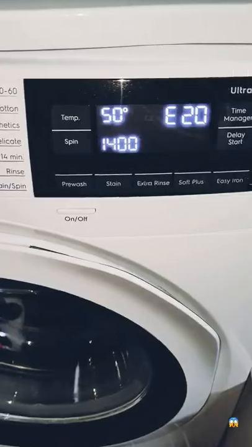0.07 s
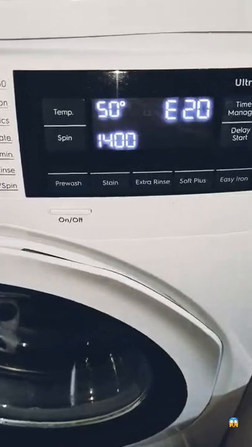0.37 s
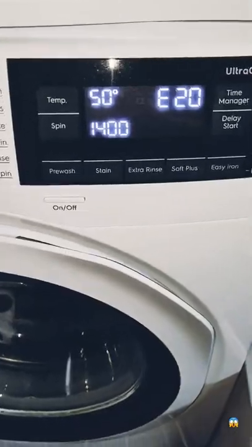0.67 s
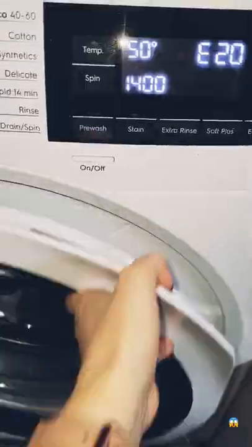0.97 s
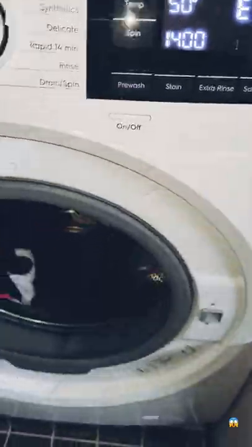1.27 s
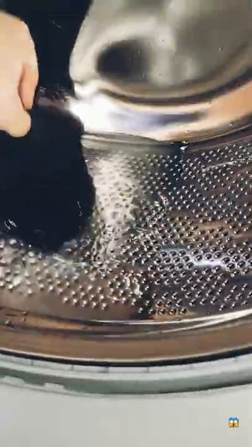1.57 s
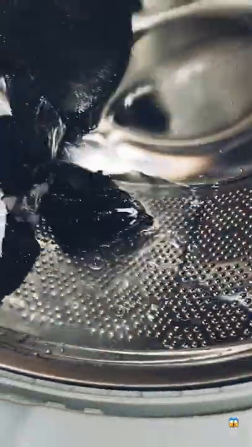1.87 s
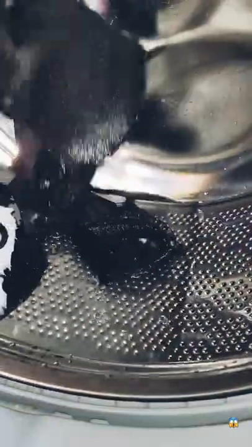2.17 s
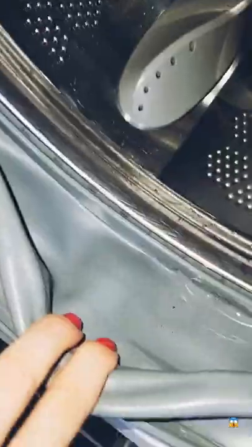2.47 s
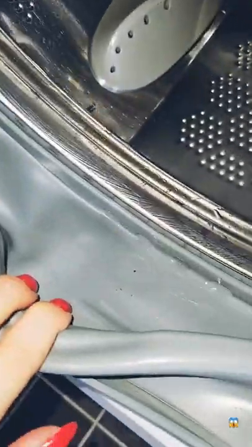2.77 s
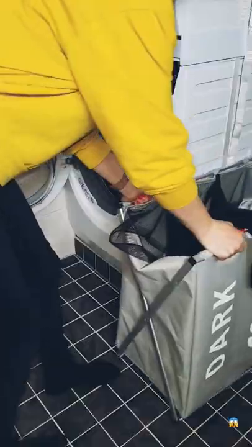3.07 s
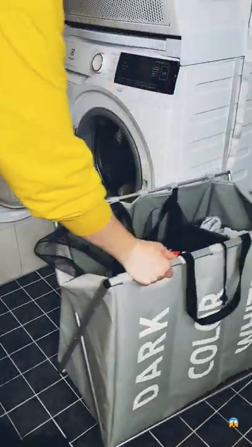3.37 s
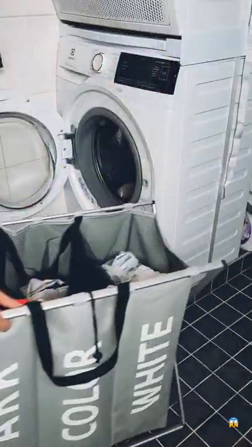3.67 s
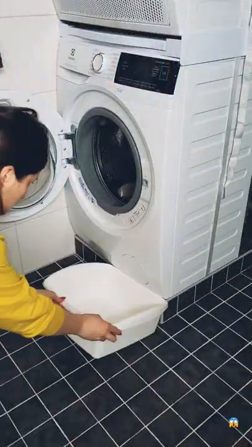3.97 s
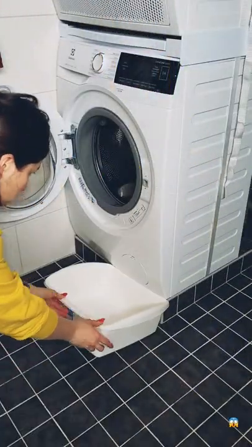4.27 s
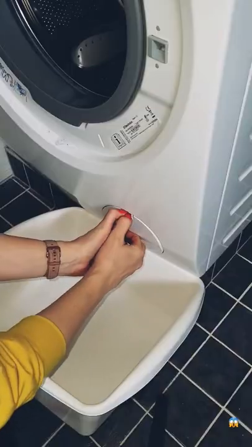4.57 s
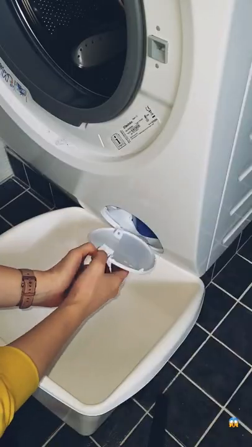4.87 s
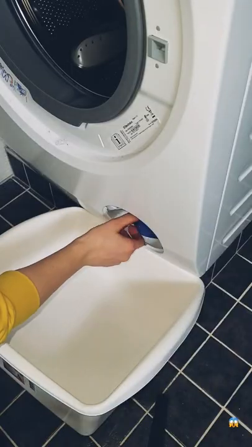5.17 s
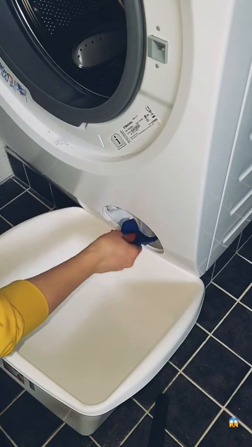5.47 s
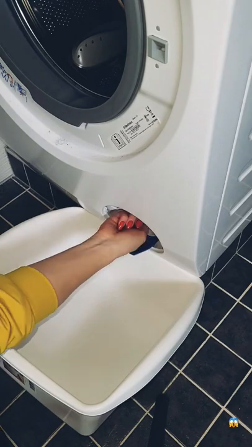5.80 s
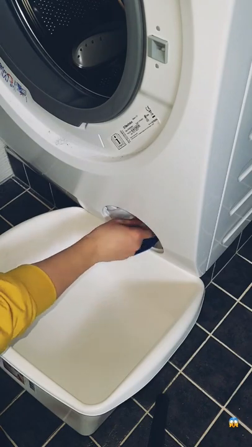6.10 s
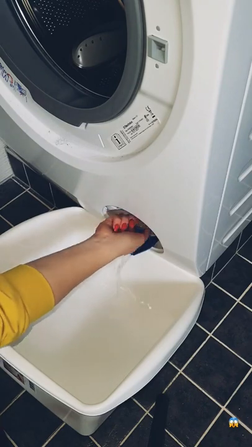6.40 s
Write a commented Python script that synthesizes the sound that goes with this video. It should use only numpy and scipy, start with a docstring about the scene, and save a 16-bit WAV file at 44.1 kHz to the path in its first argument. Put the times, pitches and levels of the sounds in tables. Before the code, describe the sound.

Water gurgles and drips softly in the bottom of a stalled washing machine, close by in a small tiled room. At about 0.9 seconds the door latch clacks and the door jolts with a deep thump, the loudest moment. From 1.2 to 2.4 seconds wet laundry squelches and drips in the drum, with sharper splashes near 1.8 and 2.3. The rubber seal rubs faintly at 2.5. From 3 to 4 seconds a hamper knocks, scrapes and judders over the tiles, growing louder and ending in two hollow bumps. Fingers rub quietly at a plastic flap, which clicks off at 5 seconds. Between 5.2 and 5.4 the tight filter cap gives three short squeaks with sharp snaps, then grinds softly round with small clicks. From 6 seconds water bubbles past the cap, spurting and pattering lightly into a plastic tray until about 6.7.

```python
"""First you hear water gurgling in the bottom of a stalled washing machine, close by in a small tiled room.
The door clacks open, wet laundry drips and splashes in the drum, and the rubber seal is pulled back.
A hamper scrapes over the tiles, a flap clicks off, the filter cap squeaks and knocks loose, and water
spurts into a plastic tray. Bubbles are short rising tones with a splash; knocks and scrapes are crowds
of tiny clicks, coloured by the part that is hit or rubbed."""
import sys
import numpy as np
from scipy import signal
from scipy.fft import rfft, irfft, next_fast_len
from scipy.io import wavfile
from scipy.ndimage import uniform_filter1d

SR = 44100
rng = np.random.default_rng(int(sys.argv[2]) if len(sys.argv) > 2 else 0)


def master(y):
    """Save y as 16-bit WAV."""
    cut = np.clip(np.atleast_2d(y).T, -1, 1)
    pcm = np.round(cut * 32767)  # scale
    wavfile.write(sys.argv[1], SR, pcm.astype(np.int16))


N = 292824
TIME = np.arange(N) / SR
PAD = next_fast_len(N + SR // 3, True)
FREQ = np.maximum(np.arange(PAD // 2 + 1) * SR / PAD, 1)


# hits of the latch and hinge: t/s, clack/dB, body/dB, tick/dB
DOOR_HITS = [(0.929, -7, -30, -27), (0.938, -13, -28.5, -35.5), (0.984, -26, -37.5, -31.5),
             (1.039, -22, -21.5, -23), (1.048, -15.5, -18, -22), (1.131, -31, -38, -33.5),
             (1.141, -21.5, -43, -29)]
# pitches the door rings at: f/Hz, width/Hz, level/dB
DOOR_MODES = [(340, 150, 1), (844, 67, 0.5), (1170, 500, 1.5), (1790, 150, -11)]

def door():
    """The latch snaps free and the door jolts on its hinge."""
    body = resonance(DOOR_MODES) + undb(-15) * resonance([(1810, 6100, 0.0015)])
    return blows(DOOR_HITS, body, rise_s=0.0013, grit_db=2.5,
                 clack_db=-8, body_db=-1.5, tick_db=-0.5, t60=0.085, body_t60=0.14)


# dull thuds of the cabinet, hamper and pump housing: t/s, f/Hz, level/dB
THUDS = [(0.938, 111, -21.5), (1.016, 113.3, -14.5), (1.045, 113.5, -1.5), (1.052, 65, -11),
         (1.571, 76.5, -34), (1.637, 64.6, -34), (2.336, 108, -28), (3.013, 92.6, -32.5),
         (3.551, 67.5, -20.5), (3.616, 79.5, -24.5), (3.693, 76.5, -22), (3.782, 85, -25),
         (3.925, 401, -11), (4.04, 276, -10.5), (4.041, 164.7, -13.5), (5.402, 112, -22.5),
         (5.634, 105, -34.5), (5.816, 181, -29)]

def thuds():
    """Big panels and hollow parts boom briefly on one low tone."""
    s, hz, db = np.transpose(THUDS)
    t60 = 0.14 * (100 / hz) ** 0.37  # lower thuds ring longer
    return rings(np.transpose([s, hz, db, t60]), glide=-0.0017, rise_s=0.0031)


# the hamper is gripped, dragged and shoved: t/s, length/s, rumble/dB, scrape/dB, judder/dB
DRAGS = [(3.06, 0.13, -56, -44.5, -56.5), (3.18, 0.86, -38.5, -40.5, -39.5),
         (3.845, 0.099, -29.5, -25, -19), (3.955, 0.08, -28.5, -25, -26)]
# tone of the hollow bag: f/Hz, level/dB
HAMPER_COLOUR = [(35, -12.5), (70, 7.5), (115, -8.5), (190, -1.5), (900, -17), (4500, -18), (7900, -21.5),
                 (10000, -25), (15000, -23)]
# pitches its frame rings at: f/Hz, width/Hz, level/dB
FRAME_MODES = [(308.4, 13.3, 9), (394.6, 47, 8.5), (468, 140, -1), (597, 26, -1.5), (685, 10, 5),
               (1024, 49, -5.5)]

def hamper():
    """The hamper's feet and cloth scrape over the tiles; sticking and slipping shakes its frame."""
    # each pull swells as it gathers speed
    rumble, sliding, shaking = strokes(DRAGS, attack_s=0.017, fall_db_per_s=276.5, swell_db_per_s=10)
    slips = grains(1200, 1) * undb(4.5 * walk(28))
    frame = resonance(FRAME_MODES) * above(150) * below(1300)
    judder = unit(shape(slips, frame)) * shaking * undb(-0.5)
    scrape = rub((rumble, sliding), HAMPER_COLOUR, rate=2400, grit_db=0.5,
                 flutter_hz=60, flutter_db=1, rumble_db=-2, scrape_db=-2, edge_hz=300)
    scrape = echoes(scrape, t60=0.028, wet_db=-2.5, top_hz=8700)
    return judder + wander(scrape, rate=35, depth_db=3, low_hz=402)


# the swinging door stirs the air, then handfuls of wet laundry shift in the drum: t/s, length/s, rumble/dB,
# fizz/dB
HANDFULS = [(1.17, 0.13, -48, -52), (1.41, 0.26, -47, -52.5), (1.69, 0.22, -53.5, -51),
            (1.93, 0.1, -53, -60), (2.28, 0.15, -63.5, -55.5)]
# water slapping the drum, later the tray: t/s, slap/dB, spray/dB
SPLASHES = [(1.453, -49, -43), (1.473, -49, -59), (1.745, -33.5, -39.5), (1.766, -19.5, -28.5),
            (1.778, -27.5, -30.5), (1.82, -31.5, -29.5), (1.865, -40, -36), (1.982, -41, -33.5),
            (2.003, -37.5, -32), (2.071, -50, -33.5), (2.326, -19.5, -20.5), (2.339, -20, -21),
            (6.342, -30.5, -39.5), (6.549, -43.5, -60), (6.62, -35, -49.5)]
# tone of the laundry and of the splashes: f/Hz, level/dB
LAUNDRY_COLOUR = [(40, -1), (85, 6.5), (210, -12.5), (1000, -38), (5000, -34.5), (7900, -35.5), (9500, -41),
                  (15000, -34)]
SPLASH_COLOUR = [(400, 5), (750, 8), (1200, 5.4), (1900, 5), (3000, 4), (7500, 11.7), (10000, 6.6),
                 (13000, 16.3), (16000, 3)]
# single bubbles and drips: t/s, f/Hz, level/dB
DRIPS = [(0.112, 785, -28), (0.283, 569, -32.5), (0.308, 763, -39), (0.335, 2740, -44), (0.405, 805, -38.5),
         (0.493, 3360, -38), (0.513, 1455, -39.5), (0.595, 750, -35.5), (0.69, 2400, -40),
         (0.725, 1155, -38), (0.795, 1620, -38.5), (0.8, 2710, -42), (0.865, 1070, -34.5),
         (1.423, 6570, -26.5), (1.455, 4460, -32.5), (1.646, 2740, -32), (1.727, 436.5, -50),
         (1.871, 4120, -33), (1.985, 5600, -29.5), (6.335, 3597, -37.5), (6.483, 2866, -42)]

def water():
    """Wet cloth fizzes, drops slap the steel and the tray, trapped bubbles ring."""
    stirring = strokes(HANDFULS, attack_s=0.0044, fall_db_per_s=130)
    fizz = rub(stirring, LAUNDRY_COLOUR, rate=6500, grit_db=2,
               flutter_hz=40.66, flutter_db=1.5, rumble_db=-4, scrape_db=-2, edge_hz=313)
    hits = [(s, slap, slap, spray) for s, slap, spray in SPLASHES]
    slaps = blows(hits, colour(SPLASH_COLOUR), rise_s=0.00452, grit_db=4,
                  clack_db=-4.5, body_db=-26, tick_db=0.5, t60=0.075, body_t60=0.12)
    drips = bubbles(DRIPS, q=7, t60_at_1khz=0.06, tone_db=-3, splash_db=2)
    drips = echoes(drips, t60=0.12, wet_db=-7, top_hz=3000)
    sloshing = wander(fizz + slaps, rate=72, depth_db=2.5, low_hz=506)
    return wander(sloshing, rate=60, depth_db=4, low_hz=515) + drips


# tugs that make the cap slip on its rubber ring: t/s, length/s, level/dB
TUGS = [(5.224, 0.025, -37.5), (5.274, 0.029, -31.5), (5.352, 0.031, -37.5)]
# the slips quicken as the cap comes free: t/s, slip rate/Hz
SLIP_RATE = [(5.224, 335), (5.255, 410), (5.291, 440), (5.39, 450)]
# pitches the slips set ringing: f/Hz, width/Hz, level/dB
SQUEAK_MODES = [(306, 56, -2), (777, 80, 6.5), (1160, 63, 0), (2275, 260, 3.5), (2700, 110, -2),
                (3100, 82, -0.5)]
# turns of the cap in its thread: t/s, length/s, rumble/dB, scrape/dB
TURNS = [(5.405, 0.071, -38.5, -50.5), (5.63, 0.08, -48, -80), (5.752, 0.012, -51, -54.5),
         (5.795, 0.017, -42.5, -61), (5.89, 0.038, -53.5, -47), (6.03, 0.074, -45, -51.5),
         (6.12, 0.11, -56, -53.5), (6.34, 0.087, -46.5, -64.5)]
# tone of the thread: f/Hz, level/dB
THREAD_COLOUR = [(40, -10), (95, 4), (270, -9.5), (1700, -17.5), (3300, -12.5), (5600, -25.5),
                 (15000, -34.5)]

def filter_cap(overtone=7):
    """The tight cap squeaks in uneven slips, then grinds round its wet thread."""
    s, slip_hz = np.transpose(SLIP_RATE)
    uneven_hz = np.interp(TIME, s, slip_hz) * (1 + 0.06 * walk(300))
    slip_count = np.cumsum(uneven_hz) / SR
    slips = np.diff(np.floor(slip_count), prepend=0) * undb(4.5 * walk(300))  # one click a slip
    hiss = 0.12 * rng.standard_normal((2, N))
    rasp = shape(slips + hiss, resonance(SQUEAK_MODES) * above(170) * below(6000))
    # the rubber squeals on one overtone, which rises as the slips quicken
    squeal = np.sin(2 * np.pi * overtone * slip_count) * undb(4.4 * walk(300))
    squeak = unit(rasp) + undb(-11) * unit(squeal)
    squeak = unit(echoes(squeak, t60=0.0204, wet_db=0.5, top_hz=7900))
    tugging = strokes(TUGS, attack_s=0.0055, fall_db_per_s=514, swell_db_per_s=30)
    turning = strokes(TURNS, attack_s=0.012, fall_db_per_s=181.5)
    grind = rub(turning, THREAD_COLOUR, rate=8300, grit_db=0,
                flutter_hz=70.86, flutter_db=3, rumble_db=0, scrape_db=2, edge_hz=280)
    return squeak * tugging + grind


# knocks on the hamper, tray, flap and cap: t/s, clack/dB, body/dB, tick/dB
PLASTIC_KNOCKS = [(3.338, -24, -33.5, -30), (3.452, -34.5, -39.5, -34), (3.549, -35, -47, -32),
                  (3.698, -36, -28, -37), (3.774, -28, -33.5, -34), (4.153, -48.5, -37, -39),
                  (4.423, -50, -48.5, -80), (4.479, -53, -52, -51), (5.044, -41, -40, -57),
                  (5.102, -48, -64, -42.5), (5.244, -32, -44.5, -40), (5.402, -25, -41, -41),
                  (5.428, -45, -41, -33.5), (5.633, -43, -53, -38.5), (5.655, -42.5, -46, -40.5)]
# pitches the plastic rings at: f/Hz, width/Hz, level/dB
PLASTIC_MODES = [(325, 105, -3), (950, 29, -12), (1702, 25, -3.5), (2210, 78, -3), (3100, 34, -14)]
# fingers pushing and pulling at the flap: t/s, length/s, rumble/dB, rub/dB
FINGER_MOVES = [(4.425, 0.017, -54, -50.5), (4.485, 0.12, -72, -55.5), (4.63, 0.039, -69, -50),
                (4.73, 0.0305, -48.5, -67), (4.94, 0.11, -48, -53.5)]
# tone of the rubbed flap: f/Hz, level/dB
FLAP_COLOUR = [(40, -9.5), (330, 4.5), (560, -1), (920, -9.5), (1300, -11), (6000, -19.5), (15000, -34)]

def plastic():
    """Hollow plastic parts knock and click; fingers slide on the flap and make it hum."""
    hollow = resonance(PLASTIC_MODES)
    body = hollow + resonance([(1810, 2900, 0.0044)])
    knocks = blows(PLASTIC_KNOCKS, body, rise_s=0.00064, grit_db=-0.5,
                   clack_db=-5, body_db=4.5, tick_db=-6.5, t60=0.14, body_t60=0.15)
    rumble, sliding = strokes(FINGER_MOVES, attack_s=0.01, fall_db_per_s=270)
    hum = unit(shape(grains(1600, 1.1), hollow * above(216) * below(1420))) * sliding * undb(-7.5)
    rubbing = rub((rumble, sliding), FLAP_COLOUR, rate=5700, grit_db=-1.5,
                  flutter_hz=52.5, flutter_db=2.5, rumble_db=-5, scrape_db=-2.5, edge_hz=300)
    return knocks + hum + rubbing


# snaps of the flap, and of the cap against its stops: t/s, f/Hz, level/dB
SNAPS = [(5.045, 910, -25), (5.247, 2800, -26), (5.290, 2340, -17), (5.403, 1730, -18), (5.654, 927.5, -24)]
# tones of the pump housing and the front panel: f/Hz, level against the hit/dB, ring time/s
HOUSING_MODES = [(2555.3, -20, 0.071), (3110, -22, 0.096), (3570, -17, 0.021)]
PANEL_MODES = [(341, -6, .22), (463, -15.5, 0.2), (848, -3, 0.14)]

def snaps_and_jolt(snap_t60=0.015, jolt_s=1.046, jolt_db=-20):
    """Plastic catches and lets go, ringing the pump housing; the door's jolt rings the front panel."""
    snaps = [(*snap, snap_t60) for snap in SNAPS]
    housing = [(s, hz, hit_db + db, t60) for s, _, hit_db in SNAPS for hz, db, t60 in HOUSING_MODES]
    panel = [(jolt_s, hz, jolt_db + db, t60) for hz, db, t60 in PANEL_MODES]
    tones = rings(snaps + housing + panel, glide=0, rise_s=0.0009)
    return echoes(tones, t60=0.09, wet_db=-6.5, top_hz=6000)


# tone of the water churning in the sump, the bottom of the tub: f/Hz, level/dB
SUMP_COLOUR = [(40, -12.5), (90, -4.5), (500, -4), (850, -15.5), (1600, -17.5), (5500, -17.5),
               (7900, -15.5), (9300, -22.5), (15000, -20.5)]

def sump(start_s=0.095, length_s=1.02):
    """Small bubbles keep bursting over a wash of water; the hollow tub blends them."""
    foam = froth(start_s, length_s, db=-47.5, low_hz=518, span=6.5, small_db=-5.5, count=200)
    churn = stroke(start_s, length_s, attack_s=0.0298, fall_db_per_s=159)
    wash = unit(shape(grains(9000, 2.4), colour(SUMP_COLOUR))) * churn * undb(-49.5)
    gurgle = bubbles(foam, q=20, t60_at_1khz=0.087, tone_db=-6, splash_db=-3.5)
    return wash + echoes(gurgle, t60=0.12, wet_db=-2, top_hz=3000)


# tone of the rubber door seal: f/Hz, level/dB
SEAL_COLOUR = [(40, -3.5), (104, 9), (185, -9.5), (560, -11), (720, -20), (1400, -26.5), (4000, -47.5),
               (15000, -65)]

def seal(start_s=2.463):
    """The rubber rubs dully as it is pulled back, and the drum drones while it is held."""
    drone = stroke(start_s, length_s=0.614, attack_s=0.004, fall_db_per_s=400)
    pull = stroke(start_s, length_s=0.013, attack_s=0.0048, fall_db_per_s=125)
    sliding = pull + undb(-39) * drone  # the fingers go on creeping over the rubber
    return rub((drone, sliding), SEAL_COLOUR, rate=3200, grit_db=0,
               flutter_hz=46, flutter_db=2, rumble_db=-46.5, scrape_db=-40.5, edge_hz=235)


def trickle():
    """Water bubbles past the loosening cap, then spurts and patters on the hollow tray."""
    leak = froth(start_s=6.02, length_s=0.24, db=-52.5, low_hz=806, span=6, small_db=-2, count=50)
    tray = resonance([(348, 170, 0.89), (552, 97, 0.23), (936, 51, -2.25)]) * above(197) * below(1060)
    spurt = stroke(start_s=6.335, length_s=0.074, attack_s=0.007, fall_db_per_s=150)
    patter = unit(shape(grains(900, 4.7), tray)) * spurt * undb(-47.5)
    return bubbles(leak, q=8.5, t60_at_1khz=0.039, tone_db=4, splash_db=5) + patter


# air pressed out of the wet cloth: t/s, length/s, level/dB
SQUELCHES = [(1.638, 0.13, -48), (1.759, 0.12, -50), (1.981, 0.08, -58)]

def squelch():
    """Squeezed laundry lets out clusters of tiny bubbles."""
    foam = np.vstack([froth(*row, low_hz=610, span=5.5, small_db=-0.5, count=36) for row in SQUELCHES])
    return bubbles(foam, q=12, t60_at_1khz=0.046, tone_db=-2.5, splash_db=-9)


# tone of the quiet room: f/Hz, level/dB
AIR_COLOUR = [(30, -11), (105, 0.5), (350, -15), (700, -26.5), (6000, -34), (15000, -28)]

def room_air(start_s=0.095):
    """A faint, low rush lies under everything."""
    return unit(shape(rng.standard_normal((2, N)), colour(AIR_COLOUR))) * undb(-67) * (TIME > start_s)


def blows(table, response, rise_s, grit_db, clack_db, body_db, tick_db, t60, body_t60):
    """Each blow is a dying burst of clicks; the low body outlasts the middle clack and the high tick."""
    s, clack, body, tick = np.transpose(table)
    parts = [(above(200) * below(700), body + body_db, body_t60),
             (above(700) * below(3500), clack + clack_db, t60),
             (above(3500), tick + tick_db, t60)]
    clicks = unit(grains(20000, grit_db))
    out = 0
    for band, db, ring_s in parts:
        passed = band * response
        passed /= np.sqrt(np.mean(np.abs(passed) ** 2))
        out = out + shape(clicks * decays(s, db, ring_s, rise_s), passed)
    return out


def rub(gains, points, rate, grit_db, flutter_hz, flutter_db, rumble_db, scrape_db, edge_hz):
    """Rough surfaces catch in uneven spurts as they slide, while the whole part rumbles."""
    rumble, scrape = gains
    catches = grains(rate, grit_db) * undb(flutter_db * walk(flutter_hz))
    high = unit(shape(catches, colour(points) * above(edge_hz)))
    low = unit(shape(rng.standard_normal((2, N)), colour(points) * below(210)))
    return high * scrape * undb(scrape_db) + low * rumble * undb(rumble_db)


def bubbles(table, q, t60_at_1khz, tone_db, splash_db):
    """Each bubble (t/s, f/Hz, level/dB) is a rising tone, plus a splash ringing the same air pocket."""
    s, hz, db = np.transpose(table)
    t60 = t60_at_1khz * (hz / 1000) ** -0.25  # small bubbles die sooner
    out = rings(np.transpose([s, hz, db + tone_db, t60]), glide=0.047, rise_s=0.0013)
    age = TIME[:SR // 5]
    for start, pitch, gain, ring_s in zip(s, hz, undb(db + splash_db), t60):
        pocket = signal.iirpeak(pitch, q, fs=SR)
        splash = unit(signal.lfilter(*pocket, rng.standard_normal((2, len(age)))))
        splash *= gain * rise_and_fade(age, 0.0048, ring_s)
        i = int(start * SR)
        out[:, i:i + len(age)] += splash[:, :N - i]
    return out


def froth(start_s, length_s, db, low_hz, span, small_db, count):
    """Random bubbles (t/s, f/Hz, level/dB), pitched from low_hz up to span times as high."""
    when, smallness, strength = rng.random((count, 3)).T
    levels = db + small_db * smallness + 8 * (strength - 0.5)
    return np.transpose([start_s + when * length_s, low_hz * span ** smallness, levels])


def rings(table, glide, rise_s):
    """Dying tones (t/s, f/Hz, level/dB, ring time/s); glide bends their pitch as they fade."""
    out = np.zeros((2, N))
    for (s, hz, db, t60), side_phase in zip(table, rng.uniform(0, 2 * np.pi, len(table))):
        i = int(s * SR)
        age = TIME[:min(N - i, int(2 * t60 * SR))]
        phase = 2 * np.pi * hz * age * (1 + glide * age / t60 / 2)
        gain = undb(db) * rise_and_fade(age, rise_s, t60)
        out[:, i:i + len(age)] += gain * np.sin([phase, phase + side_phase])
    return out


def grains(rate, spread_db):
    """Tiny random clicks of unequal size, about rate of them a second."""
    size = undb(spread_db * np.minimum(rng.exponential(size=N), 5))
    return (rng.random(N) < rate / SR) * size * rng.standard_normal((2, N))


def rise_and_fade(age, rise_s, t60):
    """A quick rise, then a fade; t60 is the ring time, the seconds it takes to fall 60 dB."""
    return (1 - np.exp(-age / rise_s)) * np.exp(-np.log(1000) * age / t60)


def decays(s, db, t60, rise_s):
    """Loudness of blows: a first crack of about a millisecond, then a swell that dies away."""
    age = TIME[:SR // 2]
    blow = rise_and_fade(age, rise_s, t60) + 0.39 * np.exp(-age / 0.00043)
    power = np.zeros(N + len(age))
    for start, gain in zip(s, undb(db)):
        i = int(start * SR)
        power[i:i + len(age)] += (gain * blow) ** 2
    return np.sqrt(power[:N])


def stroke(start_s, length_s, attack_s, fall_db_per_s):
    """Loudness of one movement: it builds up, holds, and dies away once it stops."""
    age = TIME - start_s
    return np.clip(age / attack_s, 0, 1) * undb(-np.clip((age - length_s) * fall_db_per_s, 0, 200))


def strokes(table, attack_s, fall_db_per_s, swell_db_per_s=0):
    """Loudness of several movements (t/s, length/s, level/dB, ...), one curve for each level column."""
    power = 0
    for s, length, *db in table:
        swell = undb(swell_db_per_s * np.clip(TIME - s, 0, length))
        power = power + np.outer(undb(db), swell * stroke(s, length, attack_s, fall_db_per_s)) ** 2
    return np.sqrt(power)


def walk(rate):
    """A random curve that heads for a new value rate times a second."""
    knots = np.arange(0, TIME[-1] + 1, 1 / rate)
    return np.interp(TIME, knots, rng.standard_normal(len(knots)))


def wander(x, rate, depth_db, low_hz, count=14):
    """Let each third of an octave swell and fade on its own, as shifting resonances do."""
    place = np.clip(3 * np.log2(FREQ / low_hz), 0, count - 1)
    bands = (shape(x, np.maximum(1 - np.abs(place - k), 0)) for k in range(count))
    wavering = sum(band * undb(depth_db * walk(rate)) for band in bands)
    return unit(wavering) * np.sqrt(np.mean(x ** 2))


def echoes(x, t60, wet_db, top_hz):
    """Add dense echoes from hard walls close by."""
    tail = rng.standard_normal((2, N)) * np.exp(-np.log(1000) * TIME / t60) * (TIME > 0.003)
    tail /= np.sqrt(np.sum(tail ** 2, axis=1, keepdims=True))
    return x + undb(wet_db) * shape(x, rfft(tail, PAD) * below(top_hz, order=2) * above(200))


def shape(x, response):
    """Filter a sound: response gives the gain at each pitch in FREQ."""
    return irfft(rfft(x, PAD) * response, PAD)[..., :N]


def colour(points):
    """A filter drawn through points (f/Hz, level/dB)."""
    hz, db = np.transpose(points)
    return undb(np.interp(np.log(FREQ), np.log(hz), db))


def resonance(modes):
    """A filter that rings at each row (f/Hz, width/Hz, level/dB)."""
    return sum(undb(db) / (1 + 1j * (FREQ / hz - hz / FREQ) * hz / width) for hz, width, db in modes)


def below(hz, order=8):
    """A filter that keeps what is lower than hz."""
    return 1 / np.sqrt(1 + (FREQ / hz) ** order)


def above(hz):
    """A filter that keeps what is higher than hz."""
    return np.sqrt(1 - below(hz) ** 2)


def undb(db):
    """Turn decibels into a gain."""
    return 10 ** (np.asarray(db) / 20)


def unit(x):
    """Scale to an average (rms) level of 1."""
    return x / np.sqrt(np.mean(x ** 2) + 1e-30)


# stereo width, side (left minus right) against mid (left plus right): f/Hz, level/dB
STEREO_WIDTH = [(70, -19), (130, -15), (330, -9.5), (600, -4.5), (1100, -0.5), (5500, 0.5), (8000, -8),
                (15000, -8)]

def scene():
    """All sources echo in the tiled room; the bass is nearly the same left and right."""
    sources = (thuds() + sump() + door() + water() + squelch() + seal() + hamper()
               + plastic() + snaps_and_jolt() + filter_cap() + trickle())
    air = room_air()
    mid, side = echoes(sources, t60=0.305, wet_db=-11.5, top_hz=7000) + air
    side = shape(side, colour(STEREO_WIDTH))
    return np.array([mid + side, mid - side])


def record(dry, port_hz=7870, port_width_hz=900, top_hz=15800):
    """The phone's microphone holes ring in the treble; peaks stop at full scale and the top is cut."""
    ringing = shape(dry, 1 + resonance([(port_hz, port_width_hz, 1)]))
    top_cut = signal.ellip(8, 0.2, 70, top_hz, fs=SR, output="sos")
    return signal.sosfilt(top_cut, np.clip(ringing, -1, 1))


dry = scene()
out = record(dry)
master(out)
```